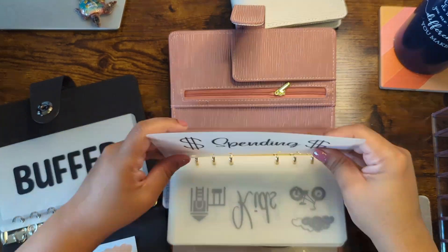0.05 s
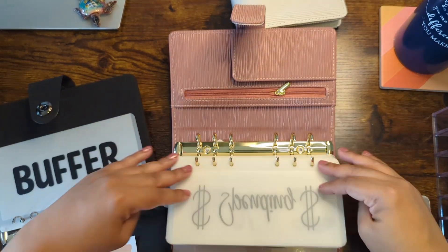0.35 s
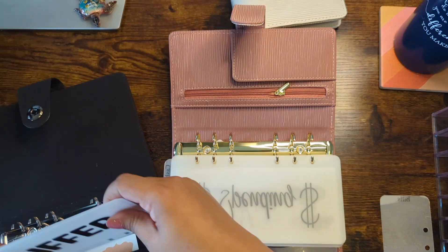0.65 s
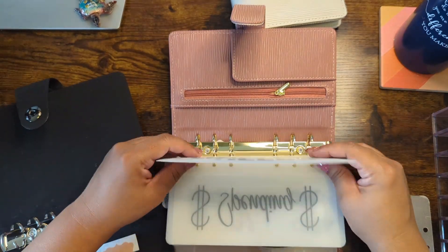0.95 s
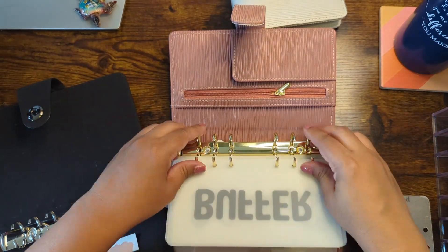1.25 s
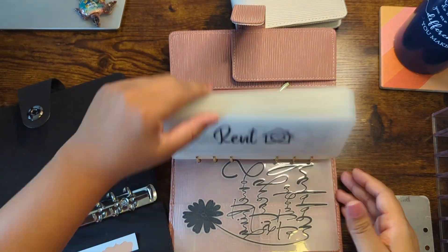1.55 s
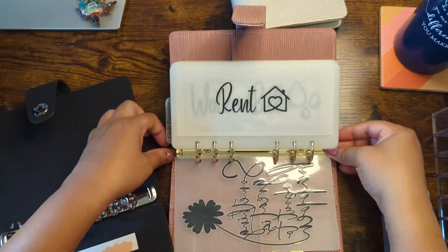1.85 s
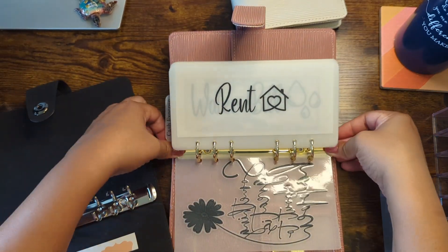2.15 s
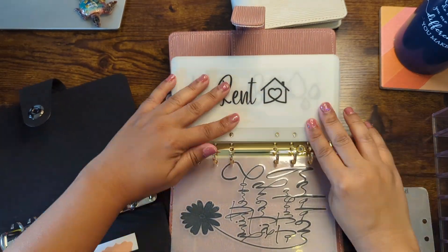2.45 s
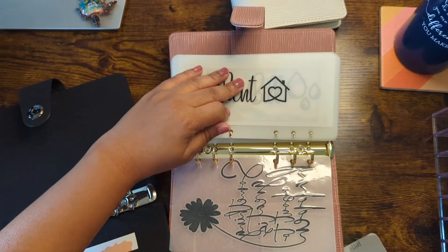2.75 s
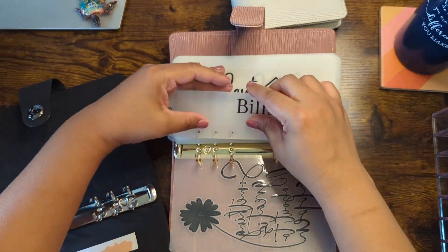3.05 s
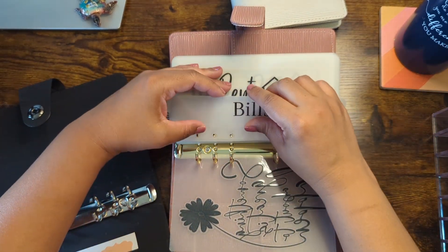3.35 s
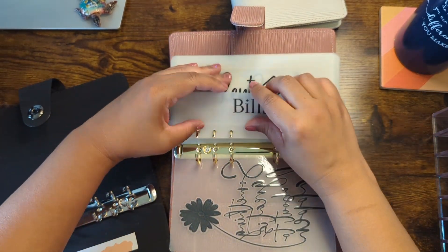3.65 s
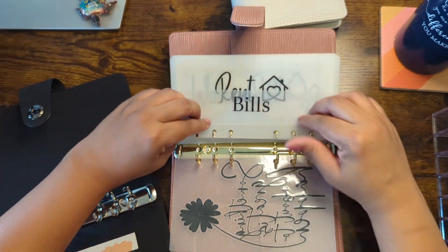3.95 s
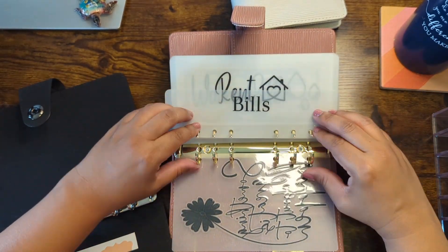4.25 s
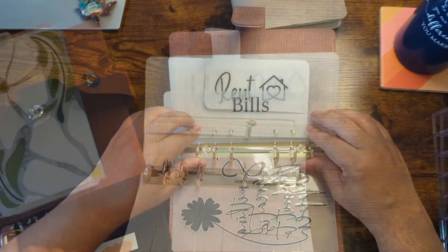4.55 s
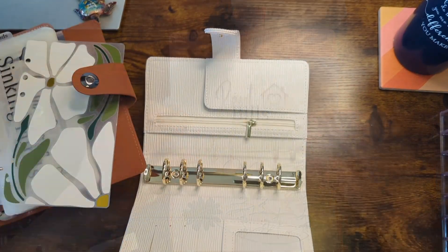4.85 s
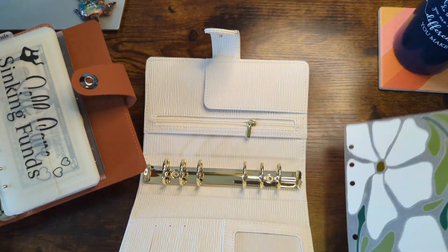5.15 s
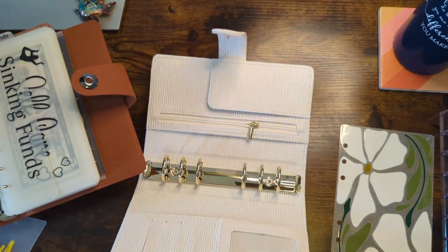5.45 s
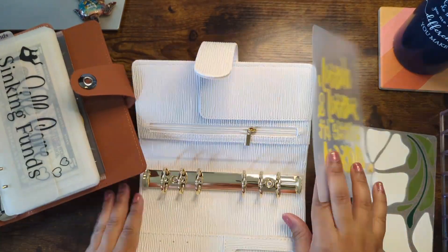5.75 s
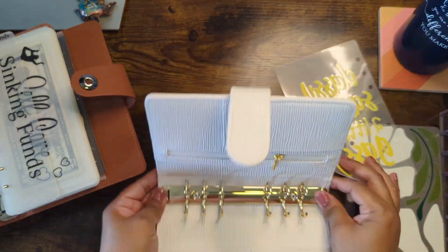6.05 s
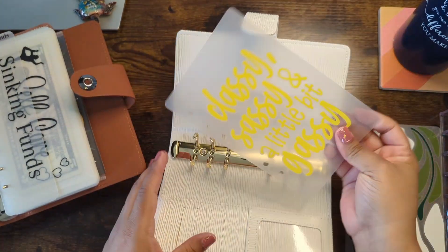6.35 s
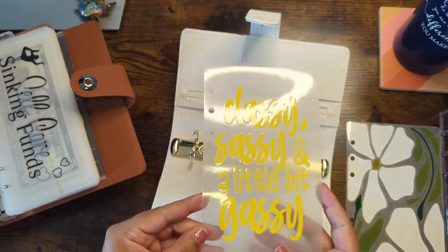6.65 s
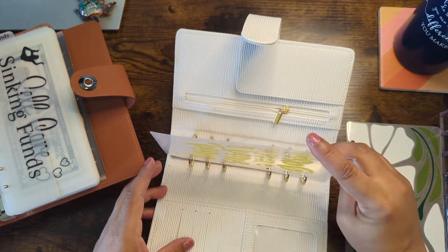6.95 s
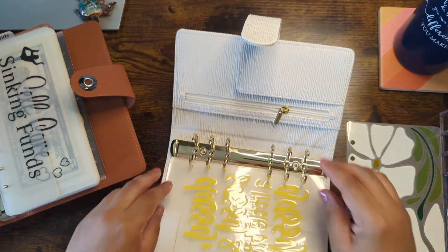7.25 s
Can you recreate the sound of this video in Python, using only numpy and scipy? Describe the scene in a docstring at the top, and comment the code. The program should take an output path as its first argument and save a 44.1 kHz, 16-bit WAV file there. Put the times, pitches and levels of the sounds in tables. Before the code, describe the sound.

Metal binder rings click and snap loudly amid light tapping and sliding of plastic envelopes on a wooden table.

```python
"""Plastic sheets tick and slide, close to the microphone, as envelopes and dividers are fitted onto the
metal rings of binders on a wooden table. The sheets catch, slip and crinkle; their edges tap the rings,
and a stack or a hand lands with a slap and a thud. Loudest are the sprung rings snapping and the covers
knocking. Behind it all a small, dry room hums quietly."""
import sys
import numpy as np
from scipy import signal
from scipy.fft import rfft, irfft, next_fast_len
from scipy.io import wavfile
from scipy.ndimage import map_coordinates

SR = 44100
rng = np.random.default_rng(int(sys.argv[2]) if len(sys.argv) > 2 else 0)


def store_pcm(level_fs):
    """Save levels as 16-bit WAV."""
    pcm = np.round(np.clip(level_fs, -1, 1) * 32767).astype(np.int16)
    wavfile.write(sys.argv[1], SR, np.atleast_2d(pcm).T)


N = 322371

# Steel rings, spine, cover and padded binder. Each row: mode in Hz, level in dB, t60 in seconds.
RING_CLICK = [(61, -33.5, 0.025), (149, -29.5, .055), (250, -31, .04), (2577, -11.5, 0.0077),
              (2980, -12, 0.0053), (3530, -19.5, 0.006), (2870, -31.5, 0.041), (6373, -31, 0.049),
              (11100, -29, .035)]
RING_CLAP = [(56.1, -37.5, 0.46), (140.5, -30, 0.33), (210, -30, 0.15), (260.2, -25.5, 0.21),
             (444, -28.5, 0.069), (1056, -25, 0.047), (3130, -22.5, 0.044), (3180, -34.5, .14),
             (3620, -15.5, 0.0234), (5210, -30, 0.1), (6410, -32.5, .08), (9030, -30.5, .06)]
RING_SPRING = [(694, -25.5, 0.023), (946, -16, 0.024), (1199, -21.5, 0.032), (1588, -34, 0.022),
               (1710, -21, 0.026), (2267, -29.5, 0.024), (4090, -17, 0.009), (2630, -68, 0.73)]
SPINE = [(55.6, -31.5, 0.16), (263, -14, 0.046), (410, -4.5, 0.012), (550, -12, 0.033), (857, -9.5, 0.019),
         (1850, -25.5, 0.024), (3300, -22.5, 0.024)]
COVER = [(402, -14, 0.025), (665, -12, 0.018), (1840, -33, 0.025), (3060, -9.5, 0.0079)]
BINDER = [(291, -4, 0.039), (470, -2, 0.043), (643, -7, 0.013)]


def snaps_and_knocks():
    """Sprung steel or a cover strikes: the parts chatter with a crack, modes ring, loose pieces rattle."""
    # Each row: start in seconds, part struck, its gain in dB, chatter in seconds, crack in dB, its t60
    # in seconds, tilt in dB per octave, rattle in dB, its t60 in seconds, left over right in dB.
    blows = [(1.2846, RING_CLICK, 0.5, 0.0022, -16.5, 0.012, 0.75, -33, 0.084, 1),
             (2.1903, SPINE, 0.14, 0.0014, -14, 0.021, -2.5, -38.5, 0.11, 1),
             (4.428, BINDER, -40.5, 0.00071, -56, 0.005, -4, -65, 0.057, 7),
             (4.6765, RING_CLAP, 1, 0.0015, -9.5, 0.0097, -0.5, -26.5, 0.26, 0.5),
             (4.7859, COVER, 1, 0.00031, -11.5, 0.013, -2.5, -33.5, 0.085, 3.5),
             (5.0813, BINDER, -41, 0.0026, -50, 0.019, -13.5, -73, 0.06, 4.5),
             (6.0547, RING_SPRING, 0.5, 0.0026, -14, 0.034, -2.5, -29, 0.092, 0)]
    # Crack and rattle. Each row: frequency in Hz, level in dB.
    colour = [(150, -31), (450, -8.5), (1100, -6), (3200, -2.5), (5000, -4), (6500, -3), (9500, -6.5),
              (14500, -7), (16500, -12)]
    out, t = np.zeros((2, N)), np.arange(SR) / SR
    for s, modes, modes_db, chatter, crack_db, crack_t60, tilt_db, rattle_db, rattle_t60, pan_db in blows:
        crack = amp(crack_db) * fade(t, crack_t60, .0005, chatter) * noise(colour, len(t), tilt_db)
        loose_parts = noise(colour, len(t), tilt_db - 1.5, ripple_db=2.0)
        rattle = amp(rattle_db) * fade(t, rattle_t60, 0.0019) * loose_parts
        body = amp(modes_db) * ring(modes, t, attack=0.00057, hold=chatter)
        add(out, s, crack + rattle + body, pan_db)
    return out


def sheet_taps():
    """Sheets touch rings and covers: clear taps, and stray ticks that grow with the handling."""
    # Each row: time in seconds, strength in dB, relative edge strength in dB, tone in Hz, its gain in dB.
    contacts = [(0.065, -51, -9, 496, 2.5), (0.156, -40.5, -12, 1066, 1.5), (0.323, -51, -4, 1060, -1),
                (0.56, -43.5, -1.5, 3110, 1.5), (0.602, -43.5, -2, 3800, 8), (0.613, -41.5, -4.5, 480, 5),
                (0.637, -45, -24, 1040, 2), (0.798, -52.5, -18.5, 3270, 2.5), (0.845, -49, -10, 3130, 5.5),
                (0.987, -52.5, -8.5, 1030, 0.5), (1.015, -52, -14, 1790, 3), (1.09, -42.5, -2.5, 2160, 0.5),
                (1.102, -49.5, -4.5, 4190, 5), (1.46, -46.5, -23, 960, -6), (1.566, -40.5, -24, 1264, 1),
                (1.593, -60.5, -18.5, 1120, 15), (1.814, -58, -9.5, 1174, -0.5),
                (2.034, -53, 0.5, 1460, 4.5), (2.43, -39, -11.5, 576, -3), (2.479, -22, -14, 583, -4),
                (2.759, -53, -21, 2670, 8), (2.869, -61, -18, 1030, 1), (2.916, -55.5, -22, 2050, 0),
                (2.929, -54.5, -8, 2610, 5), (3.082, -53.5, -13, 1180, -14), (3.208, -54, -17.5, 980, -8),
                (3.335, -56, -22, 2098, -1), (3.786, -46, -6, 553, 4.5), (3.846, -55.5, -4, 660, 2.5),
                (4.098, -67.5, 9, 3940, 1), (4.252, -59, -28, 1700, 2), (4.34, -52.5, -7, 1790, -6),
                (4.881, -46.5, -25, 3456, 4.5), (4.92, -48.5, -11.5, 980, 1), (5.022, -53, -13, 757, 0),
                (5.57, -47, -25, 726, 9.5), (5.704, -58, -3.5, 3780, 4), (5.764, -25.5, -15.5, 790, -4),
                (5.815, -36.5, -25, 2300, -6.5), (5.999, -42, -15, 3100, 6),
                (6.012, -39.5, -25.5, 2730, 10.5), (6.134, -31.5, -8.5, 2320, 12.5),
                (6.934, -58.5, -3.5, 592, 4.5), (7.068, -49, -10, 473, 2), (7.157, -29, -9.5, 609, 3),
                (7.237, -34, -19, 586, -3)]
    low_hz, high_hz = 900, 3400
    stray = [(s, rustle_db(s) + 13.5, -8, low_hz * (high_hz / low_hz) ** share, 0)
             for s, share in moments(rate=5)]
    out = np.zeros((2, N))
    for s, db, edge_db, hz, tone_db in contacts + stray:
        add(out, s - .0005, tap(db, edge_db, hz, tone_db), pan_db=1.5 * rng.standard_normal())
    return out


def tap(db, edge_db, hz, tone_db):
    """An edge ticks, the sheet rings and the binder under it knocks; harder taps are drier, less dull."""
    # The sheet and its edge. Each row: frequency in Hz, level in dB.
    sheet_colour = [(350, -28), (750, -0.5), (1500, -0.5), (3200, -5.5), (4500, -14.5), (8000, -38.5)]
    edge_colour = [(2200, -38), (4200, 1), (6500, 4), (10000, -2.5), (14500, -7.5), (16000, -17)]
    ordinary_db, ordinary_t60 = -49.5, .024
    t = np.arange(SR // 12) / SR
    harder_db = db - ordinary_db
    t60 = ordinary_t60 * 10 ** (-harder_db / 110.5)  # firm pressure damps the sheet
    # A sharp contact, then the loose sheet flutters out.
    contact = fade(t, t60, 0.00073) + amp(-14) * fade(t, 3 * t60, 0.0069)
    sheet = noise(sheet_colour, len(t), ripple_db=2.0) * contact
    tone = ring([(hz, tone_db, t60)], t, attack=0.00023)
    place = np.exp(0.17 * rng.standard_normal())  # the knock's pitch depends on where it lands
    knock = amp(-6 - 0.55 * harder_db) * ring(BINDER, t * place, attack=0.00055)
    edge = amp(edge_db + 7.0) * noise(edge_colour, len(t), ripple_db=1.0) * contact
    return amp(db + 0.5) * (sheet + tone + knock + edge)


def soft_landings():
    """A stack of sheets or a hand lands flat: the plastic slaps and the table top thuds."""
    # Each row: start in seconds, slap in dB, tilt in dB per octave, thud in dB, slap t60 in seconds.
    landings = [(1.871, -71, -4.5, -46.5, 0.04), (3.254, -53, -1.5, -53, 0.14),
                (3.530, -41, -1.5, -39.5, 0.16), (3.7, -50.5, -2, -56.5, 0.14),
                (5.245, -67, -5, -46.5, 0.054), (6.1482, -32, -5.5, -63, 0.073),
                (6.1653, -26, 6, -26, 0.056), (6.182, -27.5, 6, -44, 0.023)]
    # The slap. Each row: frequency in Hz, level in dB.
    colour = [(150, -32), (450, 0), (1100, 4.5), (2000, 4.5), (3000, 5), (4500, -3.5), (12000, -5),
              (16500, -14.5)]
    # The table top. Each row: mode in Hz, level in dB, t60 in seconds.
    table_modes = [(75, -14.5, 0.045), (142, 0, 0.086), (232, 1, 0.023)]
    out, t = np.zeros((2, N)), np.arange(SR // 3) / SR
    for s, slap_db, tilt_db, thud_db, t60 in landings:
        slap = amp(slap_db) * noise(colour, len(t), tilt_db, ripple_db=3.0) * fade(t, t60, 0.00024)
        thud = amp(thud_db) * ring(table_modes, t, attack=0.00064)
        add(out, s, slap + thud)
    return out


def sliding():
    """Each stroke swells and dies: the sheet catches, slips and hisses, creases pop, the table shudders."""
    # Sheets and fingers. Each row: middle and length in seconds, rub and hiss strength in dB.
    strokes = [(0.297, .075, -61.5, -66.5), (0.559, 0.11, -65, -72), (0.921, 0.096, -67, -75.5),
               (1.523, 0.088, -57.5, -67.5), (2.256, 0.04, -61.5, -69.5), (2.37, 0.11, -69, -79),
               (2.778, 0.04, -58, -65.5), (2.817, 0.05, -67, -79.5), (2.646, 0.07, -77.5, -78),
               (3.775, 0.17, -61, -72), (4.302, 0.074, -60, -82.5), (4.382, 0.18, -63.5, -67),
               (4.674, 0.0067, -33, -38.5), (4.895, 0.1, -56.5, -68), (5.267, 0.046, -59.5, -67.5),
               (5.341, 0.14, -69, -67), (5.537, 0.068, -57.5, -61.5), (5.798, 0.085, -59, -71),
               (6.141, 0.051, -48.5, -56), (6.271, 0.086, -63, -59), (6.411, 0.11, -71, -85)]
    # Rub, hiss and the table under a dragging hand. Each row: frequency in Hz, level in dB.
    rub_colour = [(150, -27), (350, -2.5), (600, 0.5), (1100, -3.5), (2000, -2.5), (2900, 0), (4200, -9),
                  (7000, -35.5)]
    hiss_colour = [(2500, -28.5), (4500, 2.5), (6500, 3), (9000, -3.5), (12000, -5.5), (15000, -13.5),
                   (16500, -18.5)]
    shudder_colour = [(30, -18.5), (70, 1), (140, -0.5), (220, -10.5), (450, -40)]
    finger_brushes = [(s, .03 * (.5 + share), rustle_db(s) + 4.5, rustle_db(s) - 1.5)
                      for s, share in moments(rate=5.8)]
    out = np.zeros((2, N))
    for middle, length, rub_db, hiss_db in strokes + finger_brushes:
        size = int(length * SR) + SR // 50
        speed = np.sin(np.pi * np.minimum(np.arange(size) / SR / length, 1))
        grip = stick_slip(size, rate=89, depth_db=4.0) * stick_slip(size, rate=2100, depth_db=4.0)
        scrape = amp(-2) * slips(size, rate=370, centre_hz=1980, cycles=40, spread_db=16)
        rub = amp(rub_db - 0.5) * (noise(rub_colour, size, grain=grip, ripple_db=2.5) + scrape)
        creases = amp(-3.5) * slips(size, rate=60, centre_hz=5654, cycles=17, spread_db=19.5)
        hiss = amp(hiss_db + 2.2) * (noise(hiss_colour, size, grain=grip, ripple_db=2.5) + creases)
        shudder = amp(rub_db + 2) * noise(shudder_colour, size)
        add(out, middle - length / 2, speed * (rub + hiss + shudder))
    return out


def stick_slip(size, rate, depth_db):
    """Friction: the grip changes at random, rate times a second."""
    knots = rng.standard_normal(int(size * rate / SR) + 2)
    return amp(depth_db * np.interp(np.arange(size) * rate / SR, np.arange(len(knots)), knots))


def slips(size, rate, centre_hz, cycles, spread_db):
    """Tiny releases of the sheet, rate a second, each ringing briefly at its own pitch; rms 1."""
    count, t = int(np.ceil(rate * size / SR)), np.arange(SR // 50) / SR
    when, pitch, strength = rng.random((count, 3)).T
    hz = centre_hz * 2 ** (2 * pitch[:, None] - 1)
    envelopes = amp(spread_db * strength[:, None]) * fade(t, cycles / hz, 0.00039)
    grains = envelopes * np.sin(2 * np.pi * hz * t)
    index = (when[:, None] * size).astype(int) + np.arange(len(t))
    return unit(np.bincount(index.ravel(), grains.ravel(), size)[:size])


def hand_rustle():
    """The faint, fluttering rustle of hands that never quite rest."""
    # Each row: frequency in Hz, level in dB.
    colour = [(300, -6.5), (1000, 2), (1900, 2), (2700, 1.5), (4300, -7), (6500, -6), (7600, -14),
              (8600, -8.5), (10500, -20), (16000, -23.5)]
    flutter_db = 1.63 * wobble(rate=28)
    return amp(rustle_db(np.arange(N) / SR) - 0.5 + flutter_db) * noise(colour, N)


def rustle_db(s):
    """How busy the hands are at time s."""
    # Each row: time in seconds, level in dB.
    activity = [(0.0, -80), (0.51, -80), (1.14, -74), (2.1, -80), (2.32, -74), (2.93, -82), (3.56, -79),
                (3.68, -71), (4.09, -77.5), (4.89, -74), (5.09, -78), (5.54, -69), (6.17, -67),
                (6.45, -81.5), (6.84, -86), (7.31, -77)]
    return np.interp(s, *np.transpose(activity))


def moments(rate):
    """Random times, rate a second on average, crowded where the hands are busy; each with a share 0-1."""
    when, share = rng.random((int(rate * N / SR), 2)).T
    s = np.arange(N) / SR
    effort = np.cumsum(amp(0.55 * rustle_db(s)))
    return zip(np.interp(when, effort / effort[-1], s), share)


def wall_reflections(x):
    """The short answer from the walls of a small room."""
    # Each row: frequency in Hz, t60 in seconds.
    decay_times = [(150, .1), (600, 0.16), (1500, .3), (3000, 0.1), (12000, .15)]
    hz, t, spectra = signal.stft(rng.standard_normal((2, SR // 2)), SR, nperseg=256)
    decay = np.exp(-np.log(1000) * t / along(decay_times, hz)[:, None])
    tail = signal.istft(spectra * decay, SR, nperseg=256)[1]
    return signal.fftconvolve(x, tail / np.linalg.norm(tail[0]), axes=1)[:, :N]


def room_hum():
    """The room's low rumble, wavering in level."""
    # Each row: time in seconds, level in dB.
    drift = [(0, -58), (2.0, -59.5), (3.1, -60), (4.5, -57), (5.0, -61), (5.9, -57), (6.55, -62.5),
             (7.31, -57)]
    # Each row: frequency in Hz, level in dB.
    colour = [(20, -15.5), (35, -5), (52, 0.5), (75, -1), (110, -7.5), (160, -12.5), (240, -22), (400, -30),
              (900, -45.5), (2000, -75.5)]
    drift_db = np.interp(np.arange(N) / SR, *np.transpose(drift))
    return amp(drift_db + 2.7 * wobble(rate=4.7)) * noise(colour, N)


def noise(spectrum, size, tilt_db=0, grain=1, ripple_db=0):
    """Coloured stereo noise of rms 1; grain shapes it in time, ripple adds many small resonances."""
    # Each row: frequency in Hz, left-right correlation.
    likeness = [(100, .92), (500, 0.81), (1500, 0.36), (4000, 1), (12000, 0.14)]
    peaks = rng.standard_normal(SR // 200)

    def response(hz):
        ripple = np.interp(hz, np.linspace(0, SR / 2, len(peaks)), peaks)
        colour = amp(along(spectrum, hz) + tilt_db * np.log2(hz + 300) + ripple_db * ripple)
        width = np.arccos(np.clip(along(likeness, hz), -1, 1)) / 2
        return colour * [np.cos(width), np.sin(width)]

    mid, side = filtered(grain * rng.standard_normal((2, size)), response)
    return unit(np.array([mid + side, mid - side]))


def ring(modes, t, attack, hold=0):
    """Damped modes; neighbours swing in opposite directions."""
    return sum((-1) ** k * amp(db) * fade(t, t60, attack, hold) * np.sin(2 * np.pi * hz * t)
               for k, (hz, db, t60) in enumerate(modes))


def fade(t, t60, attack, hold=0):
    """A quick rise, an optional hold and an exponential decay."""
    return np.exp(-np.log(1000) * np.maximum(t - hold, 0) / t60) * (1 - np.exp(-t / attack))


def add(track, s, sound, pan_db=0):
    """Mix a sound in at time s; it leans and reaches one side of the microphone first."""
    start = max(round(s * SR), 0)
    left, right = sound * amp([[pan_db / 2], [-pan_db / 2]])
    lag = round(rng.normal(2, 2))  # samples
    part = np.array([left, np.roll(right, lag)])[:, :N - start]
    track[:, start:start + part.shape[1]] += part


def filtered(x, response):
    """x shaped by a gain that depends on frequency."""
    n = x.shape[-1]
    padded = next_fast_len(n + 4096)
    return irfft(rfft(x, padded) * response(np.fft.rfftfreq(padded, 1 / SR)), padded)[..., :n]


def wobble(rate):
    """A smooth random curve, rate knots a second."""
    return map_coordinates(rng.standard_normal(int(N * rate / SR) + 4), [np.arange(N) * rate / SR])


def along(points, hz):
    """Interpolate (Hz, value) points on a log axis."""
    knots_hz, values = np.transpose(points)
    return np.interp(np.log(hz + 1), np.log(knots_hz), values)


def amp(db):
    return 10 ** (np.asarray(db) / 20)


def unit(x):
    return x / np.sqrt(np.mean(x ** 2) + 1e-20)


def scene():
    """Close, almost dry handling over the quiet room."""
    handling = sheet_taps() + soft_landings() + snaps_and_knocks() + sliding()
    return handling + amp(-28.5) * wall_reflections(handling) + room_hum() + hand_rustle()


def record(dry):
    """The highest peaks are rounded, the level dips briefly once and the top treble is cut off."""
    ceiling, top_hz = .9, 16200
    rounded = dry / (1 + (dry / ceiling) ** 6) ** (1 / 6)
    dip = amp(np.interp(np.arange(N) / SR, [3.222, 3.227, 3.243, 3.248], [0, -30, -30, 0]))
    return filtered(rounded * dip, lambda hz: 1 / (1 + (hz / top_hz) ** 140))


dry = scene()
out = record(dry)
store_pcm(out)
```